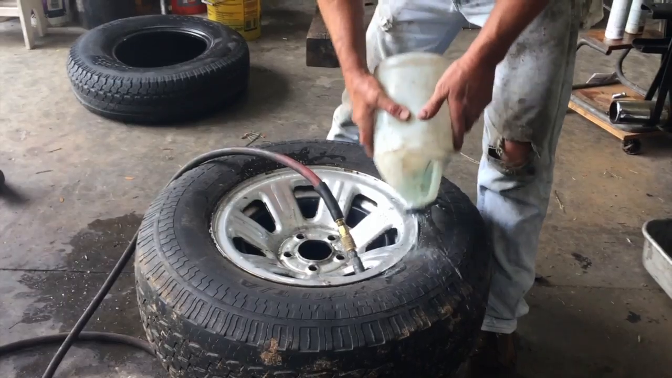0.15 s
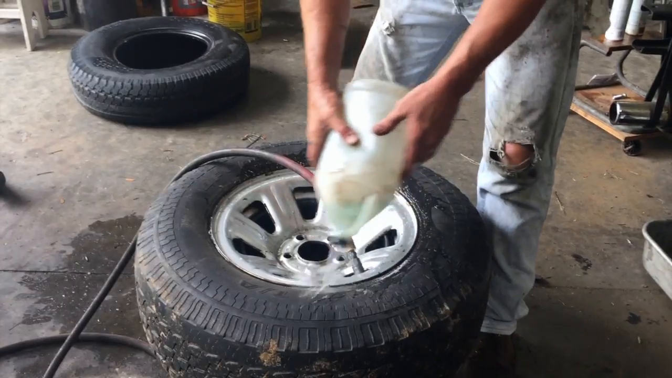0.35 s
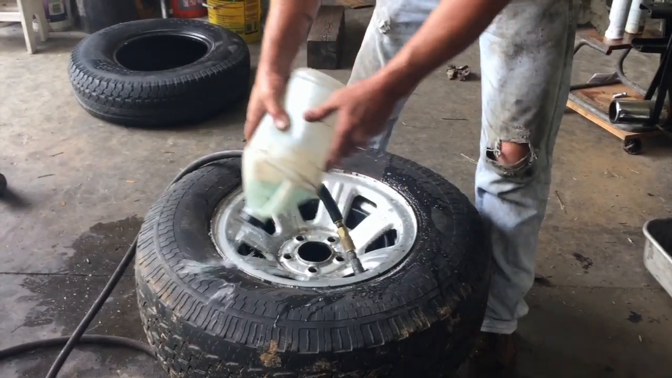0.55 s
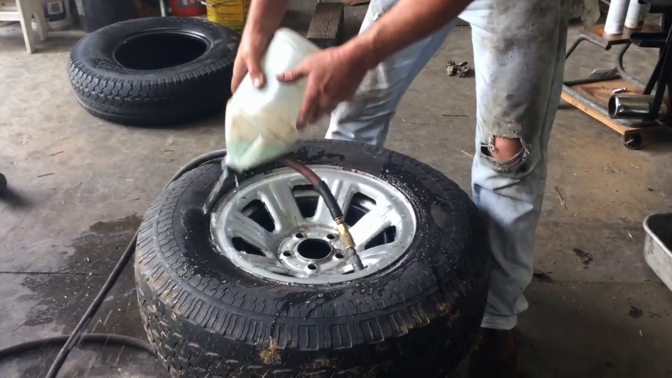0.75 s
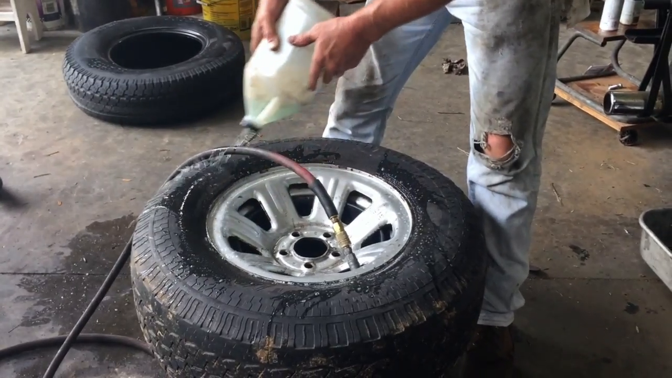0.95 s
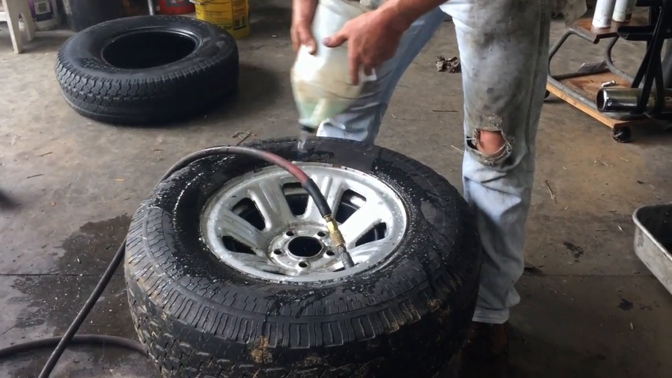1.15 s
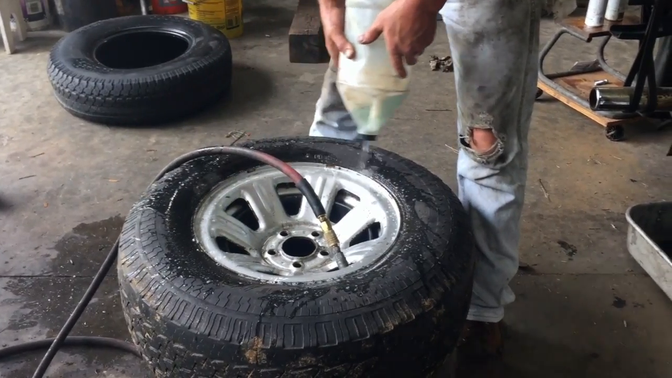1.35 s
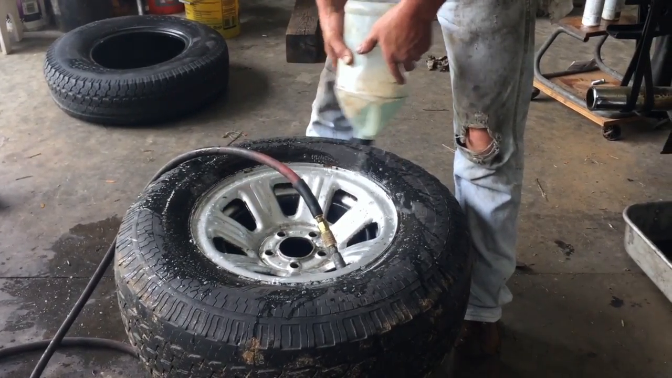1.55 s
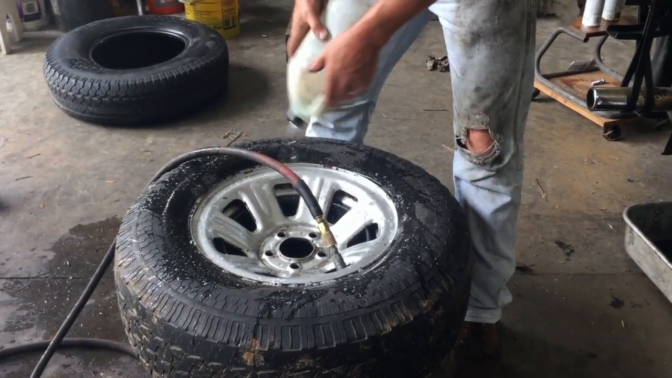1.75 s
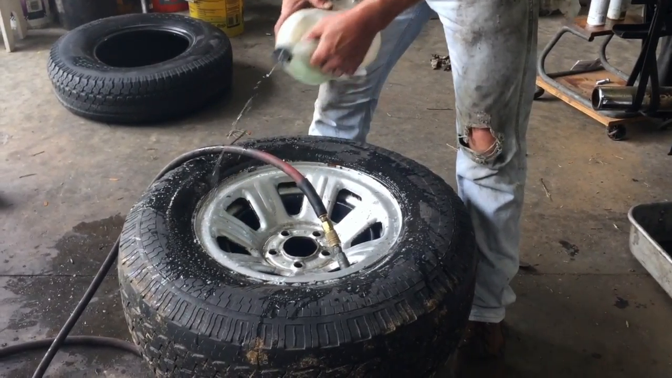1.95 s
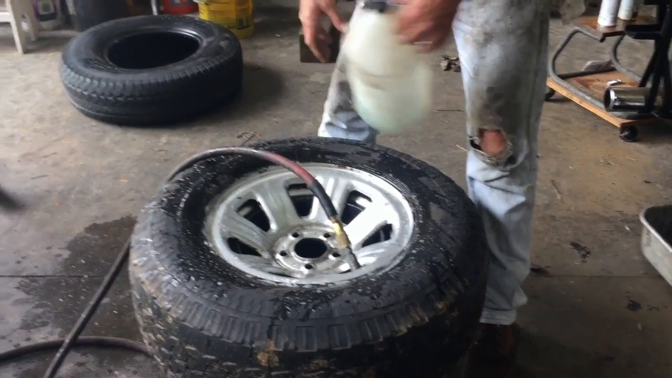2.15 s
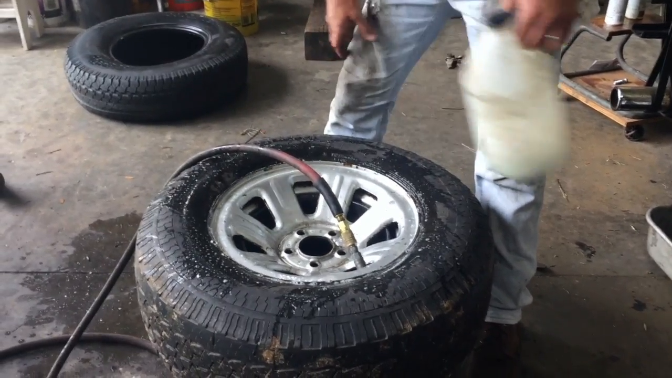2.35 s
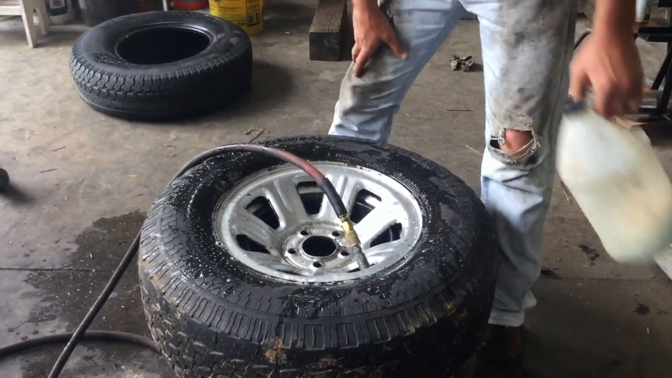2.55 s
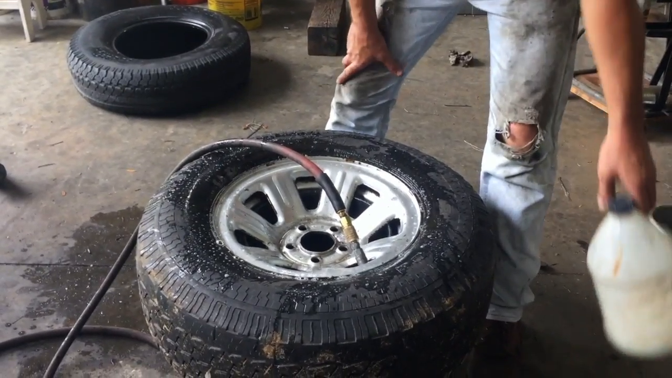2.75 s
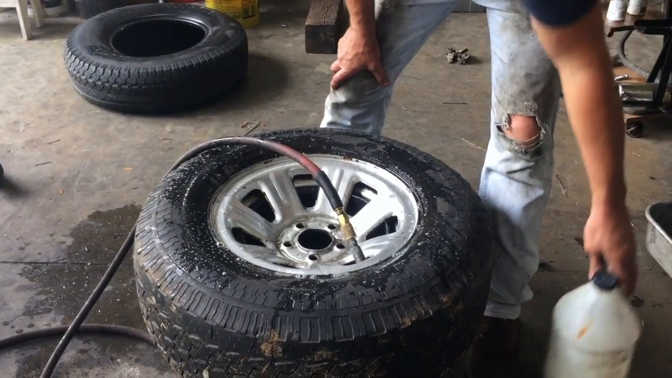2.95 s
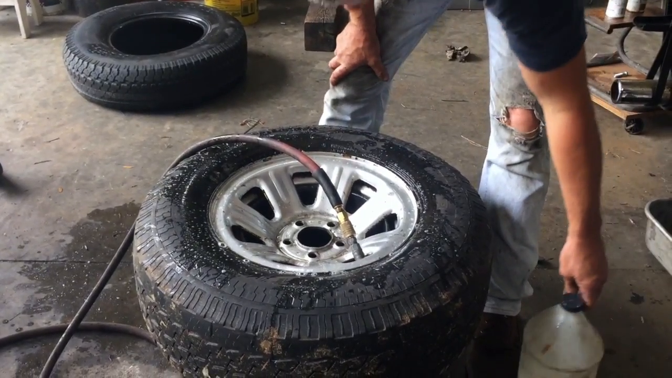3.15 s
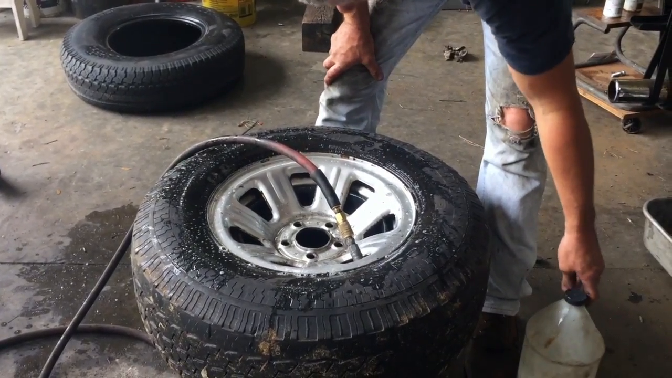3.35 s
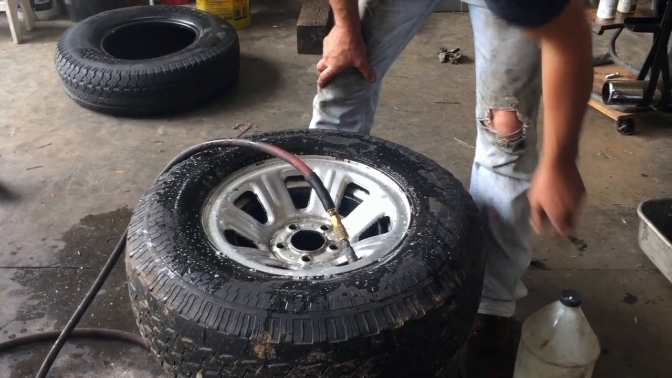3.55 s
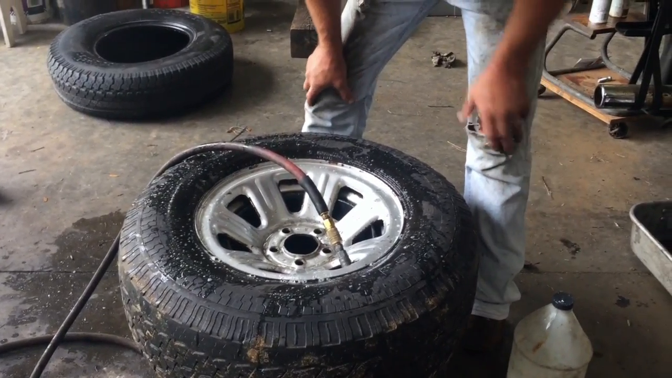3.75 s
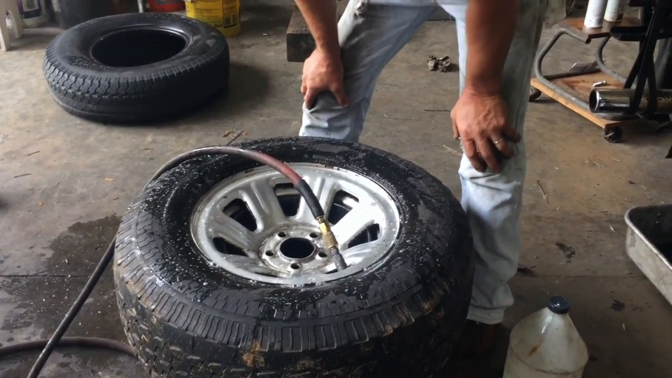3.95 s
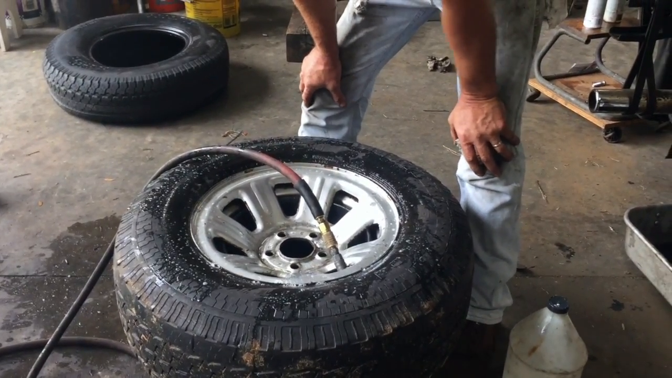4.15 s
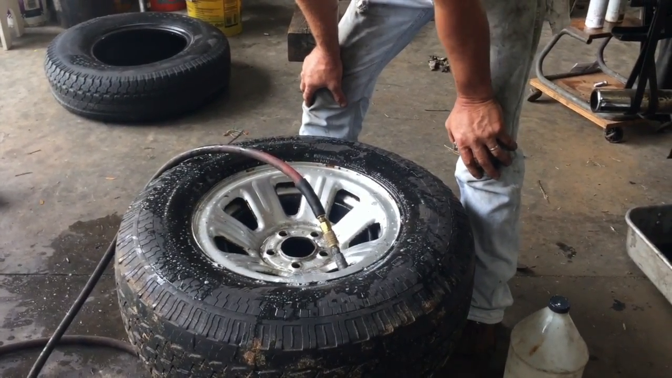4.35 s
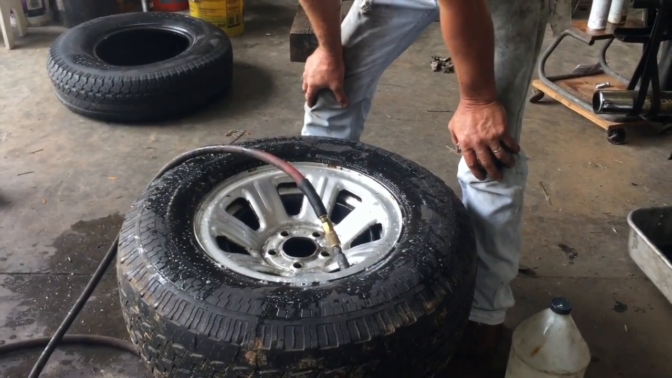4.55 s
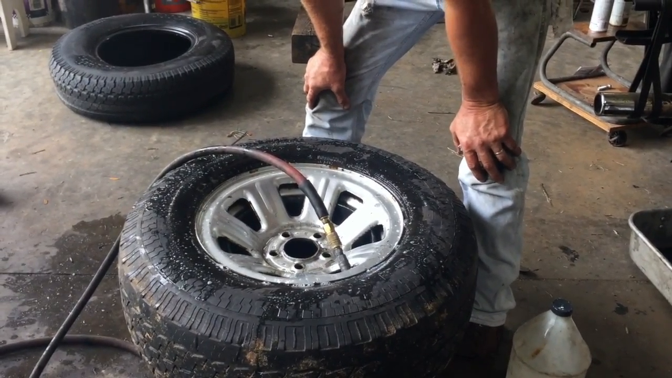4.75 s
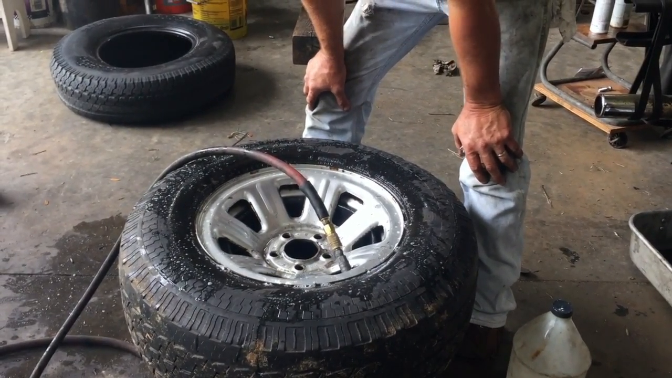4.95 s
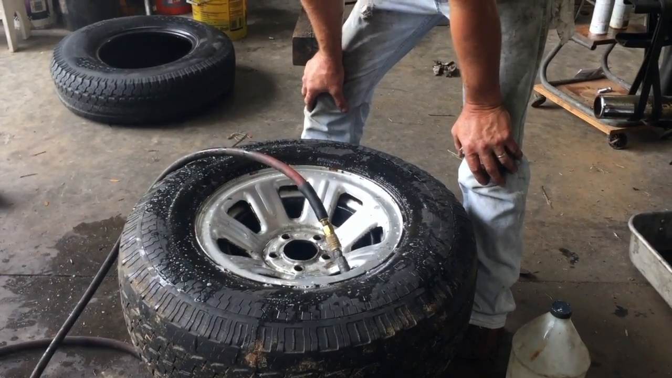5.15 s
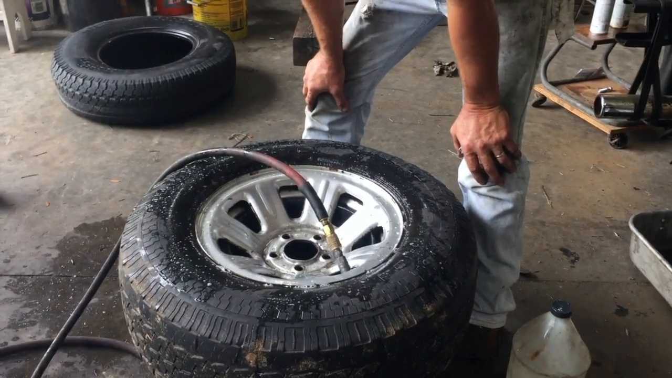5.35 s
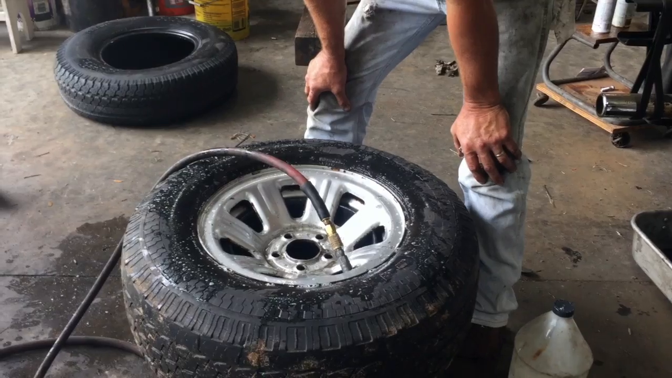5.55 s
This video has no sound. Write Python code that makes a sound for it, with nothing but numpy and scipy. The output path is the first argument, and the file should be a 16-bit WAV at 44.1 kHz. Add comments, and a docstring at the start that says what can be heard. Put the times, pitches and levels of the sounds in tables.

```python
"""Tire inflation with soapy water

Compressed air hisses through a hose into a tire on a workshop floor; the wheel rings in the jet. Soapy water
from a plastic jug patters and splashes on the rubber; low thuds boom in the tire, mostly after soft pushes. The
jug's wall pops twice, the jug is set down on concrete, a hand brushes over jeans. Low shop rumble, short room
tail, one close microphone."""
import sys
import numpy as np
from scipy import signal
from scipy.fft import rfft, irfft
from scipy.io import wavfile
from scipy.ndimage import uniform_filter1d

SR = 44100
rng = np.random.default_rng(int(sys.argv[2]) if len(sys.argv) > 2 else 0)


def wav_record(signal):
    """Record a signal, one row per channel, as 16-bit PCM in the file named by sys.argv[1]."""
    frames = np.transpose(np.atleast_2d(signal))
    bounded = np.clip(frames, -1, 1)
    # unit amplitude maps onto the largest positive 16-bit level
    quanta = np.round(bounded * 32767).astype(np.int16)
    wavfile.write(sys.argv[1], SR, quanta)


N = 251370
TIME_S = np.arange(N) / SR
FREQ_HZ = np.maximum(np.fft.rfftfreq(N, 1 / SR), 1)

# shop rumble spectrum: f/Hz, relative level/dB
RUMBLE_SPECTRUM = [(20, -28), (38, -11), (55, 10), (85, 1.5), (130, -1.5), (175, -1.5), (230, -8),
                   (450, -11), (800, -80), (1500, -56), (4000, -19.5)]
# cloth friction spectrum: f/Hz, relative level/dB
CLOTH_SPECTRUM = [(60, -17), (170, 5), (400, -2), (900, -3), (1600, 3.5), (2600, 6), (4000, -1),
                  (8000, -48)]
# hand strokes on cloth: t/s, length/s, level/dB, cutoff/Hz
CLOTH_STROKES = [(0, 0.29, -65.5, 300), (2.052, 0.29, -61.5, 350), (3.221, 0.24, -56.5, 1200),
                 (3.831, 0.083, -55.5, 700), (3.905, 0.04, -51.5, 5000), (3.995, 0.028, -61, 400),
                 (4.66, 0.093, -68.5, 900), (4.987, 0.67, -77.5, 500)]
# clearest low thuds, the two loudest with the jug's second pop: t/s, level/dB
TIRE_THUDS = [(2.184, -42), (2.24, -49), (3.008, -57.5), (3.512, -54.5), (3.849, -55), (4.015, -59.5),
              (4.646, -55), (4.727, -56.5), (5.531, -57.5)]
# clearest splashes: t/s, level/dB, f/Hz
WATER_SPLASHES = [(.07, -58, 220), (0.109, -58.5, 614), (.533, -57.5, 1690), (0.708, -55.5, 1460),
                  (0.976, -60, 666), (1.627, -63.5, 576), (1.899, -58, 460), (2.465, -58.5, 550),
                  (2.995, -60, 860), (4.696, -62, 850), (5.455, -62.5, 630)]
# jug shell modes: f/Hz, gain/dB, t60/s
JUG_MODES = [(187.5, -11, 0.12), (327, -20, 0.12), (400, -10, 0.02), (605, -14.5, 0.05),
             (656, -17.5, 0.022), (1073, -11.5, 0.025), (1255, -11.5, 0.04), (1420, -3.5, 0.019),
             (2066, -11.5, 0.018), (2490, -10.5, 0.024), (2900, -16, .02)]
# jug meets floor or hand: t/s, force level/dB, cutoff/Hz, coupling to the water/dB
JUG_CONTACTS = [(2.261, -35.5, 1510, -6.5), (3.262, -33.5, 200, 1.5), (3.2838, -17, 3000, -32),
                (3.2867, -28, 1180, -21), (3.2968, -24.5, 500, -1.5), (3.309, -28.5, 1000, 1.5),
                (3.336, -37.5, 2500, 10.5), (3.366, -35.5, 4000, -6), (3.424, -39.5, 2000, -23),
                (3.438, -42, 4000, -27)]
# ringing tones of the jug's two pops: t/s, level before low-pass/dB, f/Hz, t60/s
POP_TONES = [(.7705, -33, 380, 0.034), (0.7727, -38.5, 227, 0.19), (0.7793, -40.5, 172, 0.083),
             (2.095, -48, 276, .08), (2.1801, -42, 1036, .06), (2.1834, -28.5, 421, 0.086),
             (2.186, -35, 457, 0.012), (2.2057, -32.5, 252, 0.07)]
# whine envelope: t/s, level/dB
WHINE_ENVELOPE = [(0, -66), (.2, -59), (.45, -67), (.78, -61.5), (1.3, -77), (2.05, -74), (2.4, -68),
                  (3.16, -58), (3.5, -67), (3.72, -56.5), (3.9, -66), (4.66, -58), (4.76, -71),
                  (4.91, -51.5), (5.15, -73), (5.4, -80), (5.7, -59)]
# hiss envelope: t/s, relative level/dB
HISS_ENVELOPE = [(0.0, -42), (0.36, -43.5), (1.16, -43.5), (3.08, -44), (3.21, -42.5), (3.24, -44),
                 (5.7, -43.5)]
# jet spectrum at the valve: f/Hz, relative level/dB
JET_SPECTRUM = [(300, -21.5), (900, -26), (1150, -18.5), (1800, -14), (2250, -6.5), (2620, -11.5),
                (3050, -6), (3600, -1), (4900, -6.5), (5600, -2.5), (7600, 1.5), (9850, 2), (10400, -4.5),
                (11400, -3.5), (15600, -4)]
# comb of the tire cavity: f/Hz, maximum peak or dip/dB
COMB_DEPTH = [(1500, 11.5), (3500, 6.5), (6500, 5.5), (13000, 5)]
# modes of wheel and enclosed air: f/Hz, half-width/Hz, relative level/dB
WHEEL_MODES = [(1361, 8, 11), (1510, 7, 8), (1685, 25, 6), (1908, 7, 12), (2191, 45, 8), (2235, 9, 15),
               (2324, 20, 18), (2428, 7, 16), (2525, 20, 12), (2708, 45, 12), (2826, 9, 15), (2967, 45, 9),
               (3042, 16, 20), (3093, 21, 13), (3252, 7, 10), (3298, 7, 8), (3459, 7, 6), (3557, 11, 6),
               (3700, 7, 8), (5352, 31, 3), (5820, 14, 11), (6096, 11, 9), (6347, 14, 6), (6576, 15, 6),
               (6705, 25, 8), (7023, 16, 6), (7197, 25, 6), (7750, 7, 10), (7871, 8, 6)]
# treble modes of valve and chuck: f/Hz, half-width/Hz, relative level/dB
CHUCK_MODES = [(8460, 170, 0), (9300, 30, 4), (11420, 96, 6.5), (12440, 170, 3)]


def from_db(db):
    """Decibels to gain."""
    return 10 ** (np.asarray(db) / 20)


def unit_rms(x):
    """Scale to rms 1."""
    return x / np.sqrt(np.mean(x ** 2) + 1e-20)


def envelope(rows):
    """Linear interpolation of (t/s, value) rows."""
    return np.interp(TIME_S, *np.transpose(rows))


def colour(x, spectrum):
    """Filter x by (f/Hz, level/dB) rows."""
    hz, db = np.transpose(spectrum)
    gain = from_db(np.interp(np.log(FREQ_HZ), np.log(hz), db))
    return irfft(rfft(x) * gain, N)


def drift(rate_hz):
    """Slow random motion, rms 1."""
    return unit_rms(irfft(rfft(rng.standard_normal(N)) / (1 + (FREQ_HZ / rate_hz) ** 2), N))


def low_pass(x, hz, order=2):
    """Butterworth low-pass."""
    return signal.sosfilt(signal.butter(order, min(hz, .45 * SR), fs=SR, output="sos"), x + 1e-18)


def click(t_s):
    """Unit impulse at t_s."""
    return signal.unit_impulse(N, int(np.clip(t_s * SR, 0, N - 1)))


def ring(force, hz, t60_s):
    """One mode: a unit impulse starts a decaying sine of height 1."""
    radius, angle = from_db(-60 / (t60_s * SR)), 2 * np.pi * hz / SR
    return signal.lfilter([0, np.sin(angle)], [1, -2 * radius * np.cos(angle), radius ** 2], force + 1e-18)


def narrow_noise(hz, width_hz):
    """Turbulence in one resonance of steady or moving pitch."""
    radius = np.exp(-np.pi * width_hz / SR)
    noise = rng.standard_normal(N) + 1j * rng.standard_normal(N)
    sway = signal.lfilter([1 - radius], [1, -radius], noise)
    return np.real(sway * np.exp(2j * np.pi * np.cumsum(hz * np.ones(N)) / SR))


def swell(t_s, rise_s):
    """Soft onset at t_s, peak after rise_s, then decay."""
    age = np.clip((TIME_S - t_s) / rise_s, 0, 20)
    return age * np.exp(1 - age)


def scattered(level_db, count, spread_db=2):
    """One random event per equal time slot: rows of t/s, level/dB."""
    place, strength = rng.random((count, 2)).T
    times_s = (np.arange(count) + place) / count * N / SR
    return list(zip(times_s, level_db + spread_db * (2 * strength - 1)))


def shop_rumble(level_db, waver_db):
    """Low, wavering background noise."""
    noise = rng.standard_normal(N) * from_db(waver_db * drift(rate_hz=2.2))
    return from_db(level_db) * unit_rms(colour(noise, RUMBLE_SPECTRUM))


def shop_reverb(x, cutoff_hz, t60_s, rise_s):
    """Diffuse, dull tail from the walls."""
    age_s = TIME_S[:SR]
    tail = low_pass(rng.standard_normal(SR), cutoff_hz)
    tail *= from_db(-60 * age_s / t60_s) * (1 - np.exp(-age_s / rise_s))
    tail /= np.sqrt(np.sum(tail ** 2) * SR / (2 * cutoff_hz))  # passband gain near 1
    return signal.fftconvolve(x, tail)[:N]


def cloth_rubs(grain_db, stir_db):
    """Cloth catches and slips, each stroke with its own brightness; it stirs faintly in between."""
    friction = colour(rng.standard_normal(N) * from_db(grain_db * drift(rate_hz=31)), CLOTH_SPECTRUM)
    stir = low_pass(friction, hz=1260) * from_db(5.2 * drift(rate_hz=11))
    out = from_db(stir_db) * unit_rms(stir)
    for t_s, length_s, db, cutoff_hz in CLOTH_STROKES:
        progress = np.clip((TIME_S - t_s) / length_s, 0, 1)
        stroke = np.sqrt(np.abs(np.sin(np.pi * progress))) * low_pass(friction, cutoff_hz, order=1)
        out += from_db(db) * unit_rms(stroke) * np.sqrt(length_s * SR / N)
    return out


def tire_thuds(hz, rise_s, faint_db):
    """Brief low booms of the air in the tire: most follow soft pushes, two come with the jug's second pop."""
    return sum(from_db(db) * swell(t_s, rise_s) * np.sin(2 * np.pi * hz * (TIME_S - t_s))
               for t_s, db in TIRE_THUDS + scattered(faint_db, count=7))


def water_patter(level_db, drops_per_s, t60_cycles, pour_end_s, fade_db_per_s):
    """Random drops ring briefly on the rubber and fade once the pouring stops."""
    pitches_hz = np.geomspace(500, 1900, num=14)
    pitch_index = rng.integers(0, len(pitches_hz), N)
    drops = (rng.random(N) < drops_per_s / SR) * rng.standard_normal(N)
    rings = sum(ring(drops * (pitch_index == k), hz, t60_cycles / hz) * np.sqrt(hz)
                for k, hz in enumerate(pitches_hz))
    return from_db(level_db - fade_db_per_s * np.maximum(TIME_S - pour_end_s, 0)) * unit_rms(rings)


def water_splashes(rise_s, width_hz, faint_db, faint_hz, spread_octaves):
    """Each splash is a soft noise burst around its own pitch; faint ones fall at random."""
    faint = [(t_s, db, faint_hz * 2 ** (spread_octaves * rng.standard_normal()))
             for t_s, db in scattered(faint_db, count=10)]
    out = np.zeros(N)
    for t_s, db, hz in WATER_SPLASHES + faint:
        low_hz = np.hypot(hz, width_hz / 2) - width_hz / 2  # hz is the geometric centre
        band = signal.butter(2, [low_hz, low_hz + width_hz], "band", fs=SR, output="sos")
        out += from_db(db) * swell(t_s, rise_s) * unit_rms(signal.sosfilt(band, rng.standard_normal(N)))
    return out


def jug_knocks(cutoff_hz, water_hz, water_t60_s):
    """Contacts ring the shell and set the water inside bouncing."""
    on_shell, on_water = np.zeros((2, N))
    for t_s, force_db, contact_hz, coupling_db in JUG_CONTACTS:
        force = from_db(force_db) * low_pass(click(t_s), contact_hz, order=1)
        on_shell += force
        on_water += force * from_db(coupling_db)
    shell = sum((-1) ** k * from_db(db) * ring(on_shell, hz, t60_s)
                for k, (hz, db, t60_s) in enumerate(JUG_MODES))
    return low_pass(shell, cutoff_hz, order=4) + ring(on_water, water_hz, water_t60_s)


def jug_pops(cutoff_hz):
    """The soft wall pops twice; each pop rings in several short tones."""
    tones = sum(from_db(db) * ring(click(t_s), hz, t60_s) for t_s, db, hz, t60_s in POP_TONES)
    return low_pass(tones, cutoff_hz)


def flow_whine(hz, width_hz, flutter_db):
    """The flow keeps one sharp resonance singing; its level swells and flutters."""
    tone = narrow_noise(hz, width_hz)
    levelled = tone / np.sqrt(uniform_filter1d(tone ** 2, size=5000) + 1e-20)
    return from_db(envelope(WHINE_ENVELOPE) + flutter_db * drift(rate_hz=5.6)) * levelled


def valve_jet(whistle_db, start_hz, sink_hz_per_s, flutter_db):
    """Fluttering turbulence plus a broad whistle that sinks as the tire pressure rises."""
    turbulence = rng.standard_normal(N)
    whistle = from_db(whistle_db) * narrow_noise(start_hz - sink_hz_per_s * TIME_S, width_hz=630)
    return colour(turbulence + whistle, JET_SPECTRUM) * from_db(flutter_db * drift(rate_hz=20))


def cavity_comb(decay_s):
    """Gain per frequency: echoes circling in the tire make fine, static peaks and dips."""
    echoes = rng.standard_normal(N) * TIME_S * np.exp(-TIME_S / decay_s)
    comb = np.tanh(unit_rms(rfft(echoes).real))
    return from_db(comb * np.interp(FREQ_HZ, *np.transpose(COMB_DEPTH)))


def wheel_power():
    """Power per frequency: steep-skirted resonances of wheel, valve and chuck."""
    return sum((from_db(db) / (1 + ((FREQ_HZ - hz) / half_width_hz) ** 2)) ** 2
               for hz, half_width_hz, db in WHEEL_MODES + CHUCK_MODES)


def tire_hiss(wheel_db, gain_db):
    """The valve jet, filtered by tire cavity and wheel."""
    jet = valve_jet(whistle_db=11.5, start_hz=7149, sink_hz_per_s=122, flutter_db=0.33)
    power = cavity_comb(decay_s=0.0055) ** 2 + from_db(wheel_db) ** 2 * wheel_power()
    hiss = irfft(rfft(jet) * np.sqrt(power), N)
    return unit_rms(hiss) * from_db(envelope(HISS_ENVELOPE) + gain_db)


def scene():
    """Dry air and rumble, handling sounds with reverb; two identical channels."""
    air = tire_hiss(wheel_db=1.5, gain_db=0.69) + flow_whine(hz=4262, width_hz=5.5, flutter_db=2)
    rumble = shop_rumble(level_db=-63.5, waver_db=3)
    jug = jug_pops(cutoff_hz=900) + jug_knocks(cutoff_hz=3300, water_hz=86.5, water_t60_s=0.069)
    water = water_splashes(rise_s=0.0079, width_hz=355, faint_db=-65.5, faint_hz=650, spread_octaves=0.35)
    water += water_patter(level_db=-74, drops_per_s=200, t60_cycles=72, pour_end_s=2, fade_db_per_s=5)
    thuds = tire_thuds(hz=172, rise_s=0.012, faint_db=-60)
    handling = jug + water + thuds + cloth_rubs(grain_db=2.4, stir_db=-74)
    reverb = from_db(-13) * shop_reverb(handling, cutoff_hz=2500, t60_s=0.39, rise_s=0.0059)
    return np.tile(air + rumble + handling + reverb, (2, 1))


def record(dry):
    """Microphone band: 44 Hz high-pass, steep 15750 Hz low-pass."""
    bass_cut = signal.butter(5, 44, "high", fs=SR, output="sos")
    treble_cut = signal.ellip(12, .1, 85, 15750, fs=SR, output="sos")
    return signal.sosfilt(treble_cut, signal.sosfilt(bass_cut, dry))


dry = scene()
out = record(dry)
wav_record(out)
```